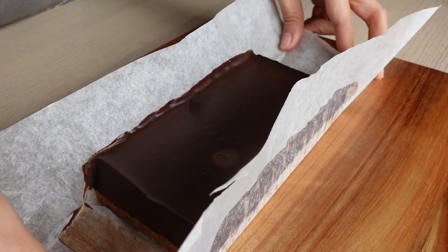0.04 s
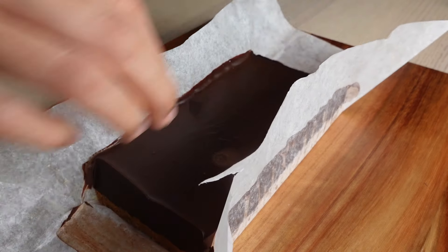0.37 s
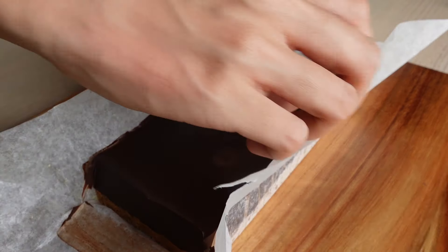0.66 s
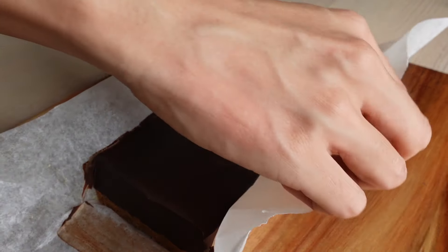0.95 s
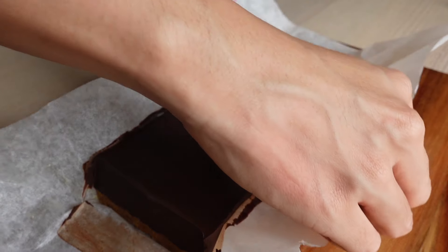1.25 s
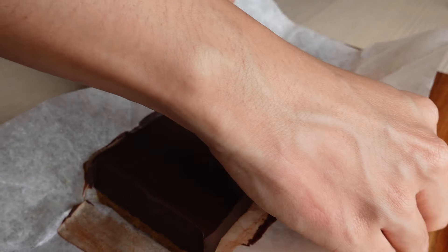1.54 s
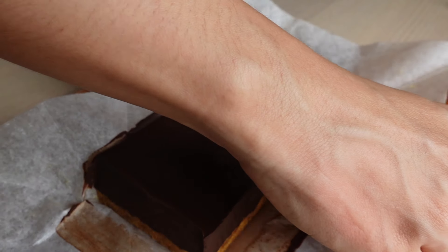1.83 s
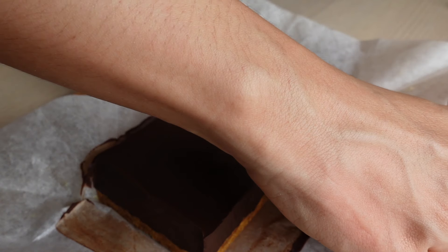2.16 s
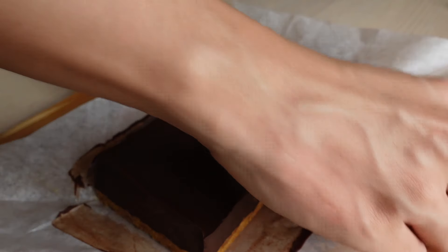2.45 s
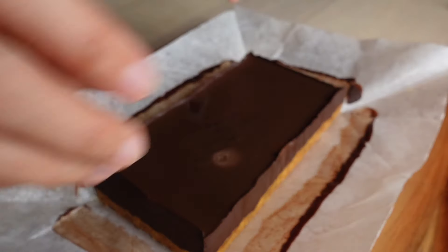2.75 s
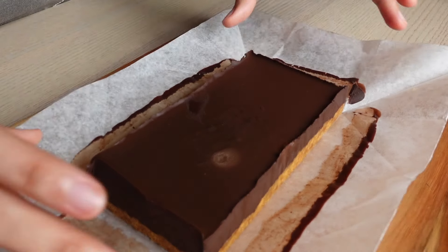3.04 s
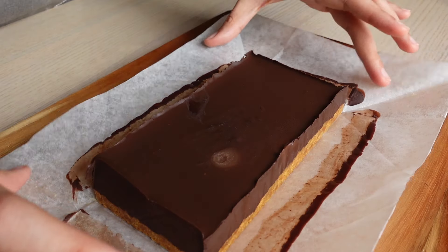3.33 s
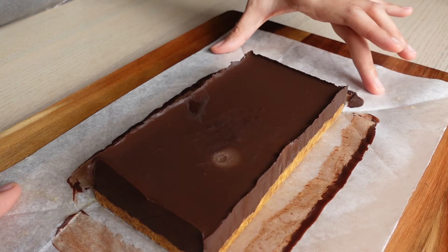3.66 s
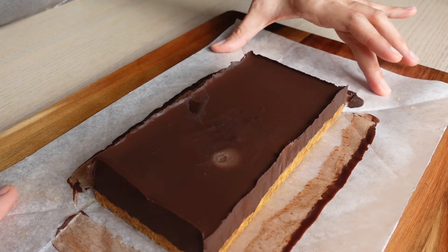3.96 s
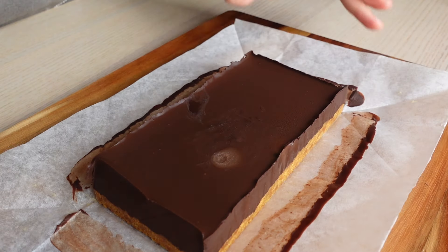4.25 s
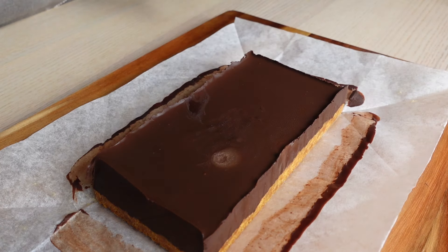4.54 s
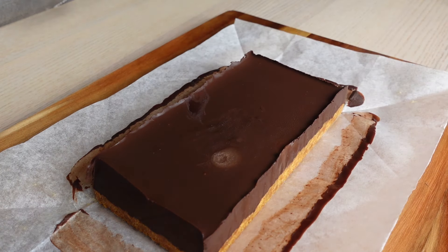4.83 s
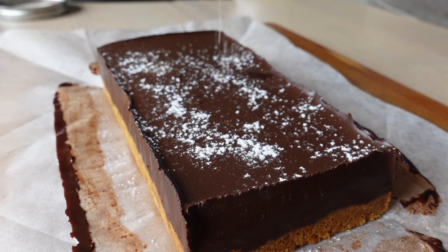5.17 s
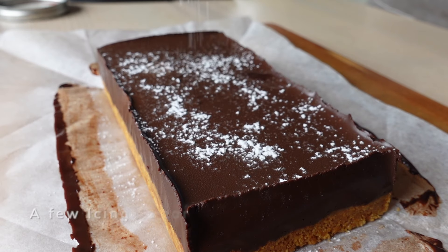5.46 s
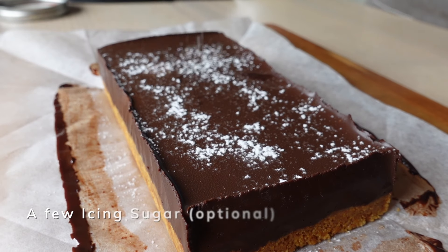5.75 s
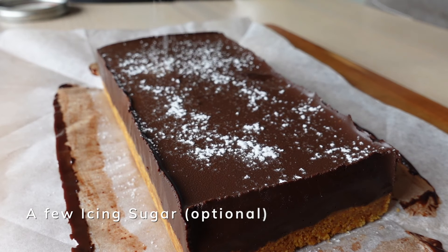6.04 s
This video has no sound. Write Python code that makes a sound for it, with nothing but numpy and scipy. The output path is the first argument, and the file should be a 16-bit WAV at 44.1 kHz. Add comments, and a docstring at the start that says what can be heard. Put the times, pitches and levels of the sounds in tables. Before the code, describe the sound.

Close, crisp crackling of baking paper handled in a kitchen, followed by light sieve shaking over a faint hum.

```python
"""Sharp snaps and fine crinkles, very close: baking paper is peeled off a chocolate slab and pressed flat
on a wooden board. Its creases buckle and ring their facets, while friction makes the sliding sheet hiss.
Then icing sugar is shaken through a small metal sieve, whose resonances rasp and tick. A kitchen
reverberates briefly behind it all, over a slowly beating motor hum, a faint whine and two thin whistles."""
import sys
import numpy as np
from scipy import signal
from scipy.fft import rfft, irfft
from scipy.io import wavfile
from scipy.ndimage import uniform_filter1d

SR = 44100
rng = np.random.default_rng(int(sys.argv[2]) if len(sys.argv) > 2 else 0)


def put_to_file(sound):
    """Save the sound as 16-bit audio at rate SR, in the file named by the first command-line argument."""
    columns = np.atleast_2d(sound).T  # one column per channel
    safe = np.clip(columns, -1, 1)
    whole_steps = np.round(safe * 32767)
    wavfile.write(sys.argv[1], SR, whole_steps.astype(np.int16))


N = 277830
TIME = np.arange(N) / SR

# spectrum of still kitchen air: f/Hz, relative level/dB
AIR_SPECTRUM = [(25, -24), (50, -18), (80, -11), (120, -2), (160, 0), (260, -2), (400, -10), (650, -13),
                (1000, -14), (1500, -13), (2400, -17), (4000, -24), (8000, -27), (15500, -28.5)]
# reverberation of the kitchen by band: f/Hz, t60/s, relative level/dB
ROOM_BANDS = [(307, 0.56, 8.5), (1000, 0.59, 3.5), (2500, 0.46, -0.5), (6000, 0.42, 1.5),
              (13000, 0.46, 3.5)]
# faint rising whistles in the pauses: t/s, duration/s, level/dB, starting f/Hz
WHISTLE_GLIDES = [(2.684, 0.65, -73, 3170), (4.85, 0.45, -74, 2630)]
# resonances of the sieve: f/Hz, bandwidth/Hz, gain/dB
METAL_MODES = [(2230, 240, -10.5), (3650, 690, -4.5), (4280, 370, -1), (5380, 240, 3), (6500, 1300, -12),
               (8100, 490, -0.5), (9230, 420, -9.5), (10300, 1100, -9), (11300, 570, -2.5),
               (13060, 610, -0.5), (13800, 300, -20), (15100, 1400, -8.5)]
# shakes of the sieve: t/s, duration/s, rasp level/dB
SIEVE_SHAKES = [(5.16, 0.082, -48.5), (5.276, 0.012, -40), (5.435, 0.11, -48), (5.538, 0.032, -42),
                (5.71, 0.031, -47), (5.775, 0.087, -50), (5.915, 0.042, -49.5), (5.972, 0.11, -45.5),
                (6.14, 0.026, -40), (6.205, 0.034, -45), (6.285, .02, -35)]
# sugar that keeps sifting between the shakes: t/s, duration/s, rasp level/dB
SUGAR_FLOW = [(5.17, 1.4, -63)]
# knocks on the sieve: t/s, relative level/dB
SIEVE_TAPS = [(5.2777, -29), (5.3841, -30.5), (5.4076, -37.5), (5.5307, -35), (5.5488, -31), (5.565, -28.5),
              (5.5724, -31), (5.6701, -35), (5.698, -32.5), (5.7323, -25.5), (5.7796, -38), (5.926, -33),
              (5.9455, -37), (5.9743, -25.5), (5.9863, -31.5), (6.0611, -29), (6.1415, -33.5), (6.152, -30),
              (6.2323, -30.6)]
# the sheet sliding under the fingers or on the board: t/s, duration/s, crest level/dB, f/Hz, Q
PAPER_SLIDES = [(0.152, 0.083, -33, 3800, 0.56), (0.296, 0.044, -50.5, 376, 1.05),
                (0.579, 0.034, -47.5, 6950, 0.17), (0.59, 0.076, -43, 475, 0.64),
                (0.672, 0.032, -45, 4800, 0.49), (.72, 0.11, -40.5, 6000, 0.35),
                (2.217, 0.058, -35.5, 2350, 2.5), (2.266, 0.036, -39, 2400, 2.5),
                (2.435, 0.11, -52, 6500, 0.76), (2.499, 0.12, -47, 6500, 0.7),
                (3.152, 0.064, -49, 6500, 0.22), (3.21, 0.08, -55.5, 4480, 0.26),
                (3.347, 0.05, -43.5, 3800, 0.64), (4.014, 0.26, -50, 7800, 0.24)]
# spectra of the paper crinkling, rubbing and flexing: f/Hz, relative level/dB
CRINKLE_SPECTRUM = [(300, -16), (700, -20), (1100, -1.5), (1600, -0.5), (2300, 4.5), (3200, -7.5),
                    (5000, -6.5), (9000, -11), (16000, -27)]
HISS_SPECTRUM = [(800, -52), (2000, 6), (3800, 10), (5500, 8.5), (8000, -1), (11000, -4), (16000, -2.5)]
FLEX_SPECTRUM = [(100, -23), (230, 7.5), (400, 7), (600, -4), (900, -17), (1600, -28)]
# pulls and presses: t/s, duration/s, then relative level/dB of crinkle, hiss, flex and small snaps
HAND_MOVES = [(0, 0.029, -33, -38.5, -48, -46), (.04, .18, -39, -51, -57.5, -37),
              (.3, 0.13, -66, -77, -66, -55), (0.602, .085, -51, -46, -47.5, -37.5),
              (0.706, 0.063, -41, -41.5, -48.5, -32.5), (0.801, 0.29, -39, -54, -55, -41),
              (1.08, 0.3, -42, -65, -63, -29), (1.323, 0.12, -36.5, -44.5, -50, -30),
              (1.463, 0.14, -64, -57, -65, -35.5), (1.655, 0.093, -43, -52.5, -56, -27),
              (1.735, 0.035, -32.5, -44, -55, -37), (1.842, 0.19, -60, -62, -63.5, -45),
              (2.222, 0.11, -43, -50, -56.5, -30), (2.343, 0.25, -70, -58, -63.5, -49.5),
              (3.243, 0.26, -54.5, -57.5, -80, -45.5), (3.67, 0.14, -58, -63, -80, -65),
              (4.165, 0.038, -48, -58, -74, -42)]
# typical pitch of small creases, rising as pressing makes their facets smaller: t/s, f/Hz
SMALL_FACET_PITCH = [(2.2, 2370), (3.5, 3540)]
# loud or lone creases buckling: t/s, relative level/dB, facet f/Hz, crack/dB and flex/dB re the facet
CREASE_SNAPS = [(.0125, -20.5, 3070, -30, -14.5), (.0527, -28, 2100, 2, 5), (.0581, -22.5, 2800, -3, -9),
                (.091, -22.5, 5770, -23, -22), (.1154, -28, 2000, -24, -23), (.32, -41, 2648, -20, 0),
                (.375, -34.5, 3600, -32, 2), (.6133, -23, 4340, -2, -14), (.6233, -21, 3970, -0.5, -11),
                (.6372, -27, 4170, -14, -2), (.7451, -14.5, 4700, 4, -16), (.7779, -24.5, 2430, 1, -7),
                (.8297, -28.5, 3650, -4, -7), (.901, -28, 3650, 1, -1.5), (1.0225, -24.5, 4200, -2, -9),
                (1.0804, -14.5, 1640, -4.5, -23), (1.09, -22.5, 1540, 1, -13), (1.1006, -22, 1890, 1, -8),
                (1.1159, -18, 2620, -12, -7), (1.1351, -23.5, 2580, -9, -8), (1.1702, -25, 4100, -5, -7),
                (1.1727, -21, 1980, -9, -12), (1.1965, -20.5, 3220, -25, -10), (1.2162, -24, 5120, -27, 4),
                (1.25, -22, 3100, -14, 5), (1.2817, -22.5, 2260, -7.5, -21), (1.2983, -25, 2630, -19, 13),
                (1.3298, -19, 1800, -10, -7), (1.3377, -17.5, 1840, -3.5, -33), (1.3493, -15, 1950, -8, -9),
                (1.3613, -19, 2900, -16, -8), (1.374, -14, 2000, -11, -1), (1.3796, -17, 1780, -24, -12),
                (1.3956, -16.5, 1700, -2, 0), (1.4097, -14, 2020, 4, -27), (1.4381, -15.5, 2550, -9, -8),
                (1.4407, -15, 2500, -26, -36), (1.5528, -24, 2738, -7.5, 1.5),
                (1.6283, -34, 1970, -30, -27), (1.6646, -25, 1950, -21, -6.5),
                (1.7079, -24, 3730, -30, -30), (1.7162, -22, 2520, -36, -32), (1.7244, -23, 1946, -12, -10),
                (1.7465, -18.5, 2700, -6, -21), (1.7561, -17.5, 4200, -19, -18),
                (1.768, -23.5, 2100, -9, -25), (1.8566, -24.5, 2600, -27, -17),
                (1.8644, -24.5, 2700, -28, -18), (1.8813, -23.5, 4030, -29, -17),
                (1.9016, -27, 2620, -24, -28), (2.0047, -34, 2430, -24, -23), (2.017, -34.5, 3070, -2, -21),
                (2.1605, -44, 2140, -14, -24), (2.238, -29, 2330, -18, -30), (2.25, -25, 2500, -24, -31),
                (2.2799, -27, 2398, -17, -32), (2.3036, -28, 2440, -11, -8), (2.321, -25.5, 3070, -24, -11),
                (2.4275, -33.5, 2930, -30, -4), (2.4595, -36.5, 4400, -26, -21),
                (2.5682, -32, 2840, -23, -28), (2.5935, -30.5, 3040, -10, -27),
                (2.6508, -39.5, 4210, -8, -1), (3.3754, -23, 3280, -8.5, -38),
                (3.4418, -35.5, 3590, -16, -26), (3.458, -30.5, 3330, -30, -32),
                (3.5196, -30.5, 4600, -14, -21), (3.5257, -23, 3720, 5, -29), (3.5326, -29, 3850, -23, -17),
                (3.6863, -30.5, 6200, -7, -32), (3.7025, -28.5, 2700, 9.5, -34),
                (3.7473, -35.5, 2740, 2.5, -25), (3.8209, -30.5, 8500, -17, -18),
                (3.9544, -32.5, 3460, -14, -36), (4.0335, -42, 2870, -14, -28),
                (4.137, -18, 5700, -34, -45), (4.1705, -33, 4460, -23, -16),
                (4.1865, -31.5, 4350, -16, -19), (4.2164, -33, 3430, -23, -30)]

LEAD_S = .003  # a crease creeps this long before it gives
ANTIPHASE = np.array([[1], [-1]])  # left and right signs of a side signal


def undb(db):
    """Amplitude ratio of a level in decibels."""
    return 10 ** (np.asarray(db) / 20)


def unit(x):
    """Normalisation to rms 1."""
    return x / np.sqrt(np.mean(x ** 2))


def fade(t, t60):
    """Exponential damping by 60 dB in t60 seconds."""
    return np.exp(-np.log(1000) * t / t60)


def colour(x, spectrum):
    """Spectral shaping by a curve of (f/Hz, level/dB) points."""
    hz, db = np.transpose(spectrum)
    bins = np.maximum(np.fft.rfftfreq(x.shape[-1], 1 / SR), 1)
    gain = undb(np.interp(np.log(bins), np.log(hz), db))
    return irfft(rfft(x) * gain, x.shape[-1])


def resonate(x, hz, width_hz):
    """Two-pole resonance with gain 1 at its centre."""
    angle = 2 * np.pi * min(hz, SR / 2 - 1) / SR
    damp = np.sin(angle) * width_hz / hz / 2
    return signal.lfilter([damp, 0, -damp], [1 + damp, -2 * np.cos(angle), 1 - damp], x)


def bandpass(x, hz, q):
    """Two equal resonances in cascade; rms 1."""
    return unit(resonate(resonate(x, hz, hz / q), hz, hz / q))


def flutter(rate, depth_db):
    """Random amplitude modulation: a gain with `rate` new values a second."""
    knots = np.arange(0, TIME[-1] + 1, 1 / rate)
    return undb(depth_db * np.interp(TIME, knots, rng.standard_normal(N)[:len(knots)]))


def grains(rate, spread_db):
    """Shot noise: about `rate` clicks a second, mostly weak and a few strong; rms 1."""
    size_db = spread_db * np.minimum(rng.exponential(size=N), 4)
    occurs = rng.random(N) < rate / SR
    return unit(occurs * rng.choice([-1, 1], N) * undb(size_db))


def strokes(rows, column, attack_s=0.0095, release_s=0.22):
    """Incoherent addition: gestures rise, hold and fall 60 dB in release_s, and their powers sum."""
    power = np.zeros(N)
    for row in rows:
        start, hold_s = int(row[0] * SR), row[1]
        t = TIME[:min(int((hold_s + release_s) * SR), N - start)]
        envelope = np.minimum(t / attack_s, 1) * fade(np.maximum(t - hold_s, 0), release_s)
        power[start:start + len(t)] += (undb(row[column]) * envelope) ** 2
    return np.sqrt(power)


def jolt(t60, scatter_db):
    """Impulsive excitation: a brief creep, a release at LEAD_S, then waves scattering in the material."""
    t = TIME[:2048] - TIME[int(LEAD_S * SR)]
    envelope = np.where(t < 0, 0.54 * fade(abs(t), 0.0024), fade(abs(t), t60))
    scatter = rng.standard_normal(len(t)) * envelope
    release = (t == 0) * rng.choice([-1, 1])
    return release + undb(scatter_db) * scatter / np.sqrt(np.sum(scatter ** 2))


def add_jolt(track, at_s, sound, db):
    """Superposition of a transient, scaled to the energy of 1 ms at the given level."""
    start = int((at_s - LEAD_S) * SR)
    sound = sound * undb(db) * np.sqrt(SR / 1000 / np.sum(sound ** 2))
    track[start:start + len(sound)] += sound[:N - start]


def air():
    """Steady broadband noise of the room, partly coherent between left and right."""
    mid, side = undb(-58.5) * unit(colour(rng.standard_normal((2, N)), AIR_SPECTRUM))
    side = colour(side, [(40, -12), (150, -7.5), (600, -3.5), (4000, -11.0)])
    return mid + side * ANTIPHASE


def motor_hum(hz=190.4, beat_hz=1.297, dip_s=0.49):
    """Beating: two close motor tones interfere, in opposite phase at dip_s; the level also wavers."""
    phase = 2 * np.pi * hz * TIME
    drift = 2 * np.pi * beat_hz * (TIME - dip_s)
    tones = undb(-60.4) * np.sin(phase) - undb(-64.9) * np.sin(phase + drift)
    return np.sqrt(2) * tones * flutter(rate=14, depth_db=2.5)


def motor_whine(hz=1501, width_hz=52):
    """Narrow-band noise is heard as the faint, unsteady tone of a running motor."""
    return undb(-77) * bandpass(rng.standard_normal(N), hz, q=hz / width_hz)


def whistles(rise_hz_per_s=1050, width_hz=160):
    """Modulation by slow noise widens a rising tone into a narrow band, which swells and fades."""
    out = np.zeros(N)
    waver = unit(uniform_filter1d(rng.standard_normal(N), int(SR / width_hz)))
    for start_s, length_s, db, hz in WHISTLE_GLIDES:
        t = np.clip(TIME - start_s, 0, length_s)
        cycles = hz * t + rise_hz_per_s * t ** 2 / 2
        swell = np.sqrt(2 * abs(np.sin(np.pi * t / length_s)))
        out += undb(db) * swell * waver * np.sin(2 * np.pi * cycles)
    return out


def kitchen(x, early_db, tail_db, width):
    """Reverberation: early reflections from the worktop and nearby things, a diffuse tail from walls."""
    t = TIME[:SR * 3 // 4]
    hz, t60, db = np.transpose(ROOM_BANDS)
    log_bins = np.log(np.fft.rfftfreq(len(t), 1 / SR) + 1)
    noise_spectrum = rfft(rng.standard_normal((2, len(t))))
    tail = 0
    for k in range(len(hz)):
        band = np.interp(log_bins, np.log(hz), np.arange(len(hz)) == k)
        tail += undb(db[k]) * irfft(noise_spectrum * band, len(t)) * fade(t, t60[k])
    tail *= np.clip(t / 0.0082, 0, 1)
    echoes = rng.standard_normal((2, len(t))) * (rng.random(len(t)) < .08)
    early = echoes * fade(t, 0.024) * (t > .002)
    response = (undb(tail_db) * unit(tail) + undb(early_db) * unit(early)) / np.sqrt(len(t))
    mid, side = signal.fftconvolve(x[None], response, axes=1)[:, :N]
    return mid + width * side * ANTIPHASE


def hollow_tick():
    """A damped resonance, struck once, gives a soft hollow tick during the sifting."""
    out = np.zeros(N)
    add_jolt(out, 5.496, bandpass(jolt(t60=0.014, scatter_db=5), 1360, q=2.3), db=-43.0)
    return out


def metal_ring(x):
    """Modal response of the sieve; random signs in the drive give each mode its own phase."""
    return sum(undb(db) * resonate(x * rng.choice([-1, 1], len(x)), hz, width_hz)
               for hz, width_hz, db in METAL_MODES)


def sieve():
    """Friction of the mesh and knocks excite the same metal modes; sugar crumbs tick on impact."""
    friction = grains(rate=3700, spread_db=4.5) * flutter(rate=120, depth_db=2.5)
    shaking = strokes(SIEVE_SHAKES + SUGAR_FLOW, column=2, attack_s=0.007, release_s=0.12)
    rasp = unit(metal_ring(friction))
    crumbs = bandpass(grains(rate=2500, spread_db=4), 5300, q=.35)
    out = shaking * (rasp + undb(-13) * crumbs)
    for at_s, db in SIEVE_TAPS:
        add_jolt(out, at_s, metal_ring(jolt(t60=0.016, scatter_db=0.5)), db - .5)
    return out


def slides():
    """Friction: fibre slips swell and fade as the sheet moves and stops; taut paper rings narrowly."""
    out = np.zeros(N)
    slips = grains(rate=12000, spread_db=2) * flutter(rate=200, depth_db=1.5)
    for start_s, length_s, db, hz, q in PAPER_SLIDES:
        span = slice(int(start_s * SR), int((start_s + length_s) * SR))
        rub = bandpass(slips[span], hz, q)
        swell = np.sin(np.linspace(0, np.pi, len(rub))) ** 2
        out[span] += undb(db) * rub * swell
    return out


def rustle():
    """Countless impulses merge into noise: tiny creases crinkle, fibres rub and the sheet flexes."""
    crinkle_gain, hiss_gain, flex_gain = (strokes(HAND_MOVES, column) for column in (2, 3, 4))
    flurry = flutter(rate=140, depth_db=1.0)
    crinkle = unit(flurry * colour(grains(rate=1800, spread_db=2.5), CRINKLE_SPECTRUM))
    hiss = unit(flurry * colour(grains(rate=8000, spread_db=2), HISS_SPECTRUM))
    flex = unit(colour(grains(rate=1100, spread_db=6.5), FLEX_SPECTRUM))
    return undb(-6.0) * crinkle_gain * crinkle + hiss_gain * hiss + undb(-3.5) * flex_gain * flex


def small_creases(count, spread_db=2.5, spread_octaves=0.33, crack_db=-12, flex_db=-13):
    """Random buckling: rows like CREASE_SNAPS, one per time slot, as strong as the hand's move."""
    effort = strokes(HAND_MOVES, column=5)
    last_start_s, last_length_s = HAND_MOVES[-1][:2]
    end_s = last_start_s + last_length_s + 0.22  # includes the last move's release
    times = LEAD_S + (np.arange(count) + rng.random(count)) / count * end_s
    level_draw, pitch_draw = rng.standard_normal((count, 2)).T
    levels = 20 * np.log10(np.interp(times, TIME, effort) + 1e-9) + spread_db * level_draw
    pitches = np.interp(times, *np.transpose(SMALL_FACET_PITCH)) * 2 ** (spread_octaves * pitch_draw)
    return [(at_s, db, hz, crack_db, flex_db) for at_s, db, hz in zip(times, levels, pitches)]


def snaps(creases, scatter_db, sing_db):
    """Buckling: each crease rings its facet; the crack dies first, the flex of the whole sheet last."""
    out = np.zeros(N)
    for at_s, db, hz, crack_db, flex_db in creases:
        # harder snaps and smaller facets are drier: the ring halves per 41 dB and per 3.2 octaves
        halvings = (db + 26.5) / 41 + np.log2(hz / 2700) / 3.2
        t60 = 0.012 / 2 ** max(halvings, -.5)
        facet = bandpass(jolt(t60, scatter_db), hz, q=1.05)
        crack = bandpass(jolt(0.94 * t60, scatter_db + 2.5), 6050, q=0.53)
        flex = bandpass(jolt(2.8 * t60, scatter_db + 7), 890, q=0.36)
        # small stiff facets always carry some crack
        crack_gain = np.hypot(undb(crack_db), (hz / 9000) ** 2)
        # the facet also sings briefly near its pitch
        song = bandpass(facet, hz * 2 ** (0.23 * rng.standard_normal()), q=7)
        snap = facet + undb(sing_db) * song + crack_gain * crack + undb(flex_db) * flex
        add_jolt(out, at_s, snap, db + 2)
    return out


def scene():
    """Superposition of direct sound, reverberation and background: paper, then sieve, in one kitchen."""
    small_snaps = snaps(small_creases(count=170), scatter_db=-1, sing_db=-7.5)
    handling = rustle() + slides() + sieve() + hollow_tick() + small_snaps
    direct = snaps(CREASE_SNAPS, scatter_db=.5, sing_db=-8) + handling
    # the room receives each snap's radiation in all directions, so its colour evens out
    radiated = snaps(CREASE_SNAPS, scatter_db=-26, sing_db=-27) + handling
    room = kitchen(radiated, early_db=-16, tail_db=-9, width=0.048)
    # waves scattered across the sheet reach left and right slightly differently
    spread = undb(-18) * snaps(CREASE_SNAPS, scatter_db=5, sing_db=-20) * ANTIPHASE
    return direct + room + spread + motor_hum() + air() + motor_whine() + whistles()


def record(dry):
    """Band limiting: filters thin the bass below 42 Hz and cut the treble above 16 kHz."""
    thinned = signal.sosfilt(signal.butter(2, 42, "highpass", fs=SR, output="sos"), dry)
    return signal.sosfilt(signal.ellip(10, .1, 80, 16000, fs=SR, output="sos"), thinned)


dry = scene()
out = record(dry)
put_to_file(out)
```